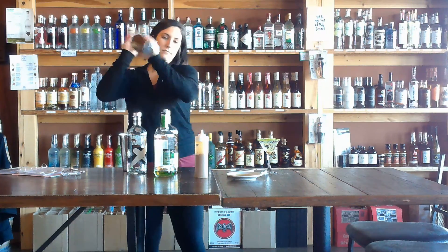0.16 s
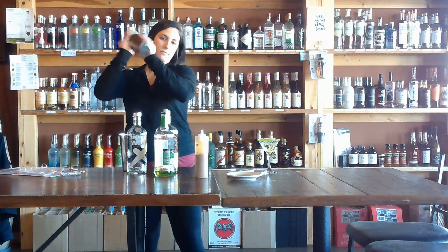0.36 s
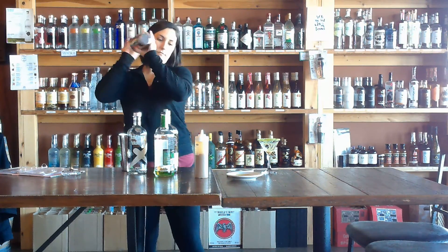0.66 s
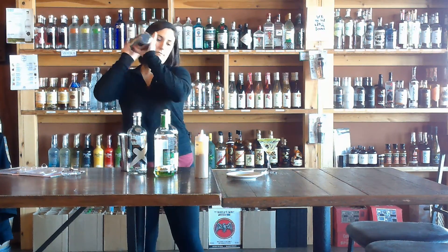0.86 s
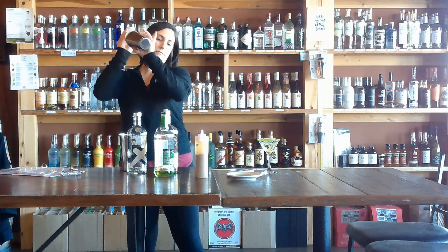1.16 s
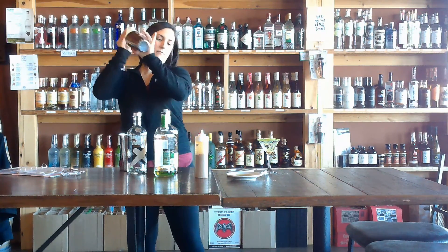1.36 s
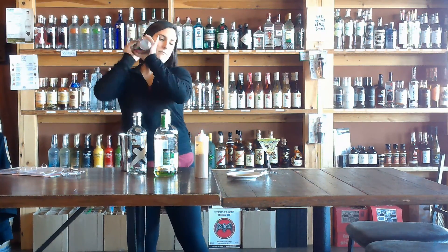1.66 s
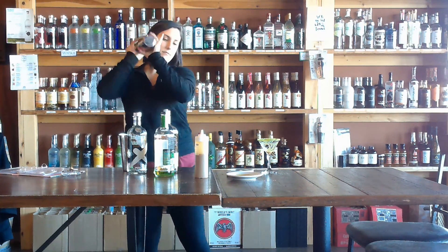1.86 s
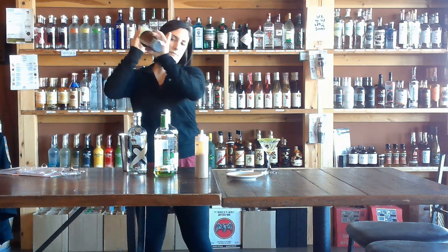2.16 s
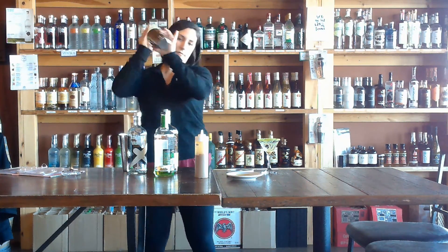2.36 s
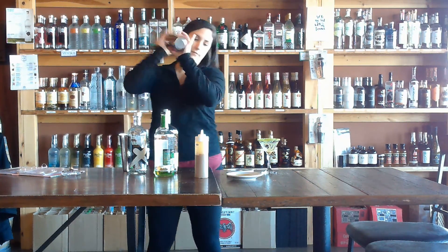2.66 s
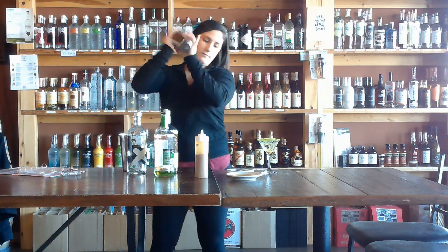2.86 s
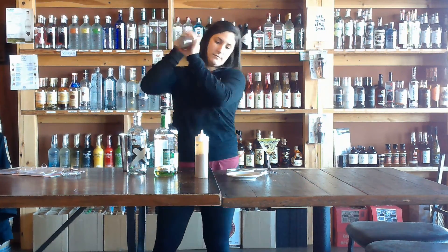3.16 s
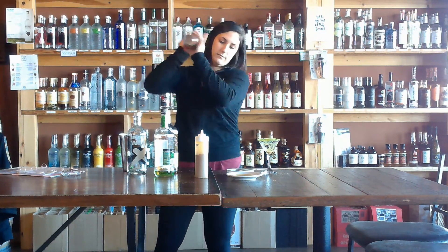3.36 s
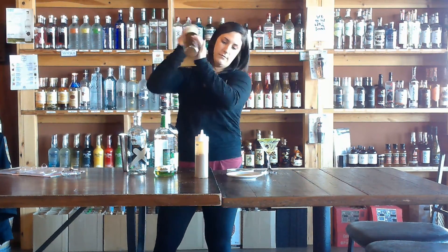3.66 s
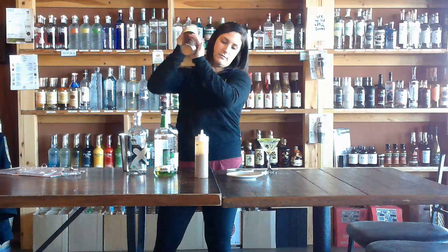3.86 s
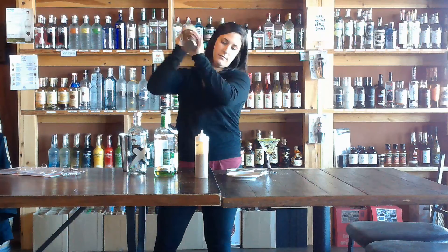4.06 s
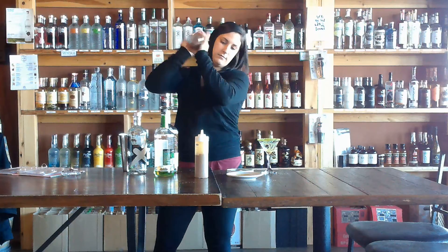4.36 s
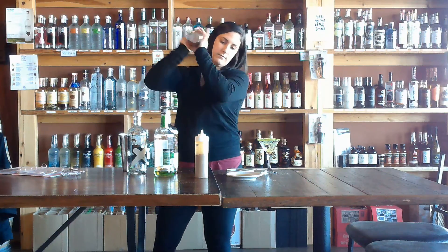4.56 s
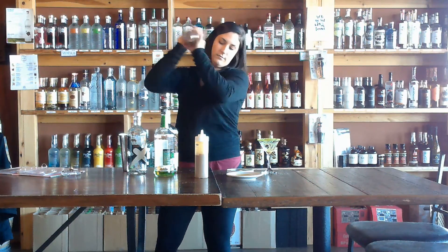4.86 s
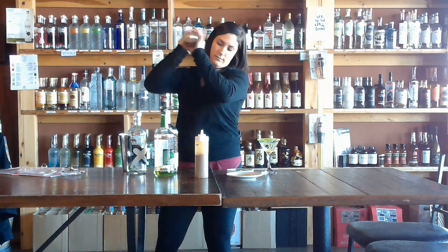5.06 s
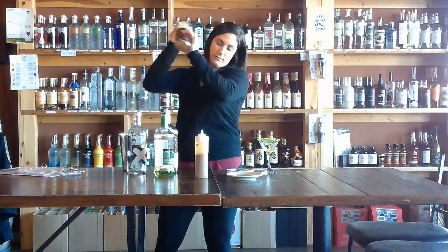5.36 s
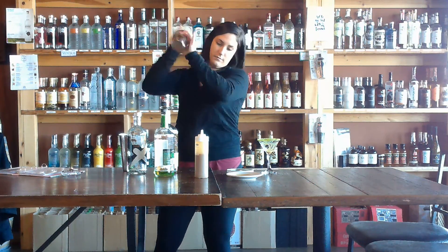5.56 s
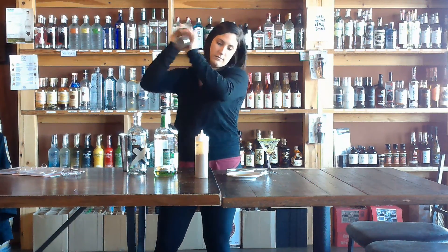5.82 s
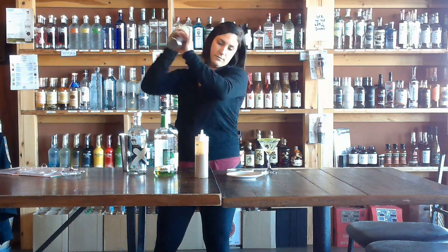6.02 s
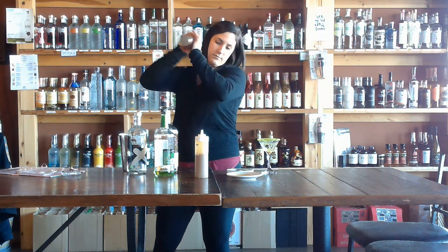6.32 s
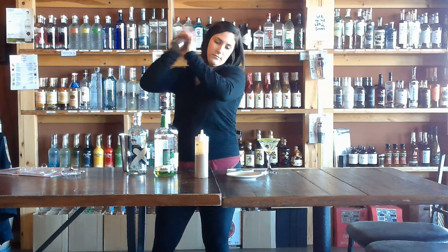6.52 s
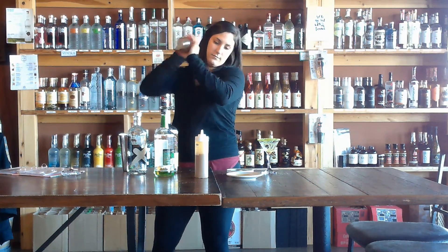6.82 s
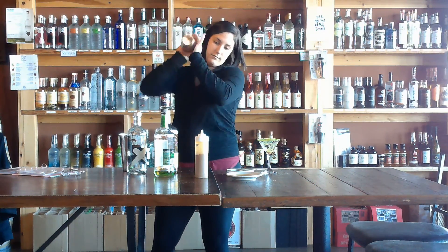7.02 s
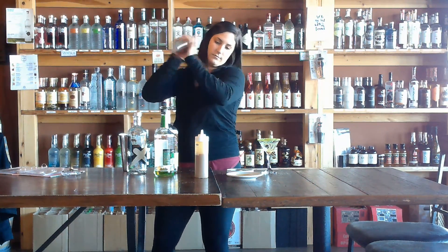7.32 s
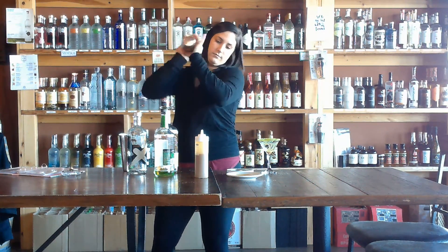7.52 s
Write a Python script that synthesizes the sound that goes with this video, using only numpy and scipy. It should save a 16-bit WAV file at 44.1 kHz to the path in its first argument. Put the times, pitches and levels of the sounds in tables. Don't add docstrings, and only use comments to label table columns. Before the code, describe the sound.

Ice and liquid surge to and fro inside a steel tin from start to end without a pause. Each cycle joins a dry, bright hiss of chips with a hard, short knock and some slosh; strengths vary, with irregular cracks. The stereo microphone stands a few metres off, catching early reflections from shelves and counter. Underneath, a lorry rumbles away early, then only low room hum and faint distant drone remain.

```python
import sys
import numpy as np
from scipy import signal
from scipy.fft import rfft, irfft
from scipy.io import wavfile
from scipy.ndimage import uniform_filter1d

SR = 44100
rng = np.random.default_rng(int(sys.argv[2]) if len(sys.argv) > 2 else 0)


def decibels_to_gain(level_db):
    exponent = np.asarray(level_db, float) / 20
    return 10 ** exponent


def generate_wav(signal):
    frames = np.transpose(np.atleast_2d(signal))
    scaled = np.clip(frames, -1, 1) * 32767
    pcm = np.round(scaled).astype(np.int16)
    wavfile.write(sys.argv[1], SR, pcm)


N = 338996

# start in [s], peak in [dB], ring in [Hz], ring length in [ms].
BASE_KNOCKS = [(0.1389, -34, 1700, 4.7), (0.3525, -22, 1610, 1.8), (0.557, -28, 1710, 2.5),
               (0.7639, -17.5, 1785, 2.9), (0.9649, -16, 1777, 4.2), (1.388, -14.5, 1754, 4.2),
               (1.5763, -16, 1770, 6.4), (1.6925, -34, 1766, 9.6), (1.7879, -20, 1690, 3.1),
               (1.9905, -18, 1785, 9.9), (2.1929, -20.5, 1700, 5.4), (2.397, -16.5, 1733, 9.6),
               (2.6288, -20, 1714, 4.3), (2.7019, -33, 1680, 6.8), (2.8376, -14.5, 1740, 1.3),
               (3.057, -20, 1680, 2), (3.2527, -23, 1740, 10), (3.675, -19.5, 1690, 1.7),
               (3.889, -13.5, 1740, 6.6), (4.1102, -19, 1693, 4.6), (4.3169, -22.5, 1680, 1.9),
               (4.9494, -21.5, 1790, 2.1), (5.3646, -19.5, 1774, 6), (5.4839, -30, 1800, 4.4),
               (6.0597, -20, 1750, 2.8), (6.7321, -23, 1690, 2.8), (6.9404, -32, 1740, 5.9),
               (7.0685, -35, 1860, 5.5), (7.17, -21, 1790, 2.5), (7.671, -20, 1740, 2.9)]


def unit(x):
    return x / np.sqrt(np.mean(x ** 2))


def colour(x, points):
    hz, db = np.transpose(points)
    log_hz = np.log(np.arange(N // 2 + 1) * SR / N + 1)
    return irfft(rfft(x) * decibels_to_gain(np.interp(log_hz, np.log(hz), db)), N)


def ring(x, hz, width_hz):
    return signal.lfilter(*signal.iirpeak(hz, hz / width_hz, SR), x)


def ring_twice(x, hz, width_hz):
    return ring(ring(x, hz, width_hz), hz, width_hz)


def grains(per_s, spread_db):
    hit = rng.random(N) < per_s / SR
    size = decibels_to_gain(spread_db * np.minimum(rng.exponential(size=N), 3))
    return unit(hit * rng.choice([-1, 1], N) * size)


def place(times_s, sounds):
    out = np.zeros(N + sounds.shape[1])
    for s, sound in zip(times_s, sounds):
        start = int(s * SR)
        out[start:start + len(sound)] += sound
    return out[:N]


def hard_contacts():
    # start in [s], peak in [dB], body in [dB re the edge].
    crack_rows = [(0.146, -29, -12), (0.169, -22, -25), (0.385, -22, -10), (0.615, -21, -13),
                  (0.965, -29, -11), (0.9792, -15.5, -16), (1.9886, -15, -17), (2.3092, -23, -16),
                  (2.396, -21, -27), (2.736, -24, -9), (2.8374, -18, -20), (3.055, -19, -23),
                  (3.382, -22.5, 0), (3.8886, -33, 6), (4.2081, -23, -14), (4.249, -19, -20),
                  (4.7375, -20, -8), (5.263, -24, -7), (5.2825, -22, -3), (5.3646, -19, -32),
                  (5.7044, -26, -5), (6.5126, -25, -20), (6.634, -24, -6), (6.731, -27, -9),
                  (6.963, -22, -16), (7.0494, -26, -14), (7.2864, -26, -21), (7.405, -20, -19),
                  (7.4345, -16.5, -20), (7.5457, -30, -35)]
    lead_s, touch_db, touch_body_db = 0.00077, -10.5, -8
    touches = [(s - lead_s, db + touch_db, touch_body_db) for s, db, *_ in BASE_KNOCKS]
    return np.transpose(crack_rows + touches)[:, :, None]


def chip_beams(per_s, spread_db, shared):
    own = np.array([grains(per_s, spread_db) for _ in "LR"])
    return own + shared * grains(per_s, spread_db)


def tin_wall(x, modes):
    return sum((-1) ** k * decibels_to_gain(db) * ring(x, hz, width_hz) for k, (hz, width_hz, db) in enumerate(modes))


def rattle():
    # time of peak in [s], chips in [dB], cubes in [dB].
    to_cap = [(0.725, -38, -40), (1.094, -37.5, -49), (1.297, -39.5, -62), (1.905, -44, -46),
              (2.13, -46, -52), (2.337, -44, -43), (2.533, -38.5, -49), (2.762, -36.5, -39),
              (2.97, -44, -46), (3.173, -38.5, -49), (3.404, -41.5, -64), (3.592, -42.5, -62),
              (3.801, -36.5, -38), (4.04, -36.5, -40), (4.25, -39.5, -48), (4.467, -35, -46),
              (4.659, -41, -38.5), (4.867, -35.5, -41), (5.062, -42, -52), (5.306, -36, -45),
              (5.518, -37.5, -34.5), (5.732, -36, -45), (5.993, -32.5, -43), (6.213, -37, -40),
              (6.413, -41, -40), (6.662, -38.5, -58), (6.864, -40, -38), (7.089, -36.5, -45),
              (7.319, -33.5, -37.5), (7.573, -35.5, -38)]
    # time of peak in [s], chips in [dB], cubes in [dB], drink in [dB].
    to_base = [(0.149, -49, -62, -45), (0.375, -53, -46, -39), (0.578, -37.5, -58, -31.5),
               (0.989, -54, -38, -53), (1.41, -52, -55, -53), (1.606, -44, -41, -38),
               (2.013, -39, -33, -47), (2.228, -41, -34, -61), (2.424, -37.5, -44, -54),
               (2.653, -41, -48, -39), (2.846, -34.5, -34.5, -42), (3.08, -43, -37, -44),
               (3.269, -41, -37.5, -37), (3.682, -43, -39, -37), (3.912, -48, -30.5, -51),
               (4.114, -51, -48, -58), (4.334, -40, -59, -37.5), (4.761, -41.5, -44, -35.5),
               (4.959, -38, -31.5, -37.5), (5.178, -49.5, -41, -37.5), (5.387, -39, -40, -37),
               (5.632, -44, -36, -33.5), (5.864, -42, -40, -35), (6.098, -42, -48, -37.5),
               (6.305, -54, -35, -49), (6.537, -49, -68, -39), (6.966, -49, -63, -41),
               (7.194, -41, -39, -37.5), (7.437, -48, -49, -43)]
    # time in [s], level in [dB].
    chatter = [(0.0, -21.5), (0.64, -28), (0.92, -21.5), (1.39, -25.5), (1.86, -26), (2.332, -28),
               (3.25, -28.5), (4.07, -27), (4.45, -26.5), (4.71, -29), (5.27, -30.5), (5.8, -26),
               (6.19, -27), (6.51, -27.5), (7.69, -28)]
    # frequency in [Hz], level in [dB].
    hiss = [(2000, -17), (5000, 1.5), (7000, 2.5), (10000, 0), (12000, 1), (14000, -0.5), (16000, 0.5),
            (18000, -37)]
    # frequency in [Hz], level in [dB].
    slosh = [(300, -10.5), (700, -19), (1000, -1.5), (1400, -0.5), (2200, 3), (4000, -20)]
    # frequency in [Hz], width in [Hz], level in [dB].
    wall_low = [(1750, 400, 5), (2475, 2370, -5.5), (1740, 50, 3), (2900, 900, -2.5), (3830, 1400, 1.5)]
    # frequency in [Hz], width in [Hz], level in [dB].
    wall_high = [(3048, 315, 4), (4620, 590, 1.5), (5284, 470, 8.5), (5450, 604, 7.5), (6480, 490, -8)]

    cap_ring_db, base_ring_db, ring_growth = -32, -42.5, 0.44
    cap_drink_db = -59
    cap = [(*row, cap_drink_db, cap_ring_db) for row in to_cap]
    base = [(*row, base_ring_db) for row in to_base]
    s, chips_db, cubes_db, drink_db, ring_db = np.transpose(cap + base)[:, :, None]
    ring_db = ring_db + ring_growth * (chips_db + 38)

    rise_s, fall_s, lead_s = 0.03, 0.031, 0.06
    t = np.arange(9000) / SR - lead_s
    swell = np.where(t < 0, np.exp(-(t / rise_s) ** 2), np.exp(-t / fall_s))
    start_s = s[:, 0] - lead_s
    rest = decibels_to_gain(np.interp(np.arange(N) / SR, *np.transpose(chatter)))

    contact_s, contact_db, _ = hard_contacts()
    spray_fade = np.exp(-np.arange(4000) / SR / 0.0099)
    spray = place(contact_s[:, 0], decibels_to_gain(contact_db - 20) * spray_fade)

    layers = [(chips_db - 0.4, -20, 1.0, colour(chip_beams(2200, 5.1, 0.71), hiss)),
              (cubes_db - 2.5, -14, 0.56, tin_wall(chip_beams(1000, 4.9, 0.85), wall_low)),
              (ring_db - 5, -21, 0.88, tin_wall(chip_beams(2000, 4.3, 0.11), wall_high)),
              (drink_db - 5, -22, 0.45, colour(grains(1500, 8.1), slosh))]
    out = 0
    for surge_db, rest_db, splinter_gain, sound in layers:
        level = place(start_s, decibels_to_gain(surge_db) * swell) + decibels_to_gain(rest_db) * rest + splinter_gain * spray
        out = out + level * unit(sound)
    return out


def knocks():
    s, db, hz, ms = np.transpose(BASE_KNOCKS)[:, :, None]
    t = np.arange(8000) / SR
    attack = np.minimum(t / 0.00066, 1)
    fade = np.exp(-(1000 * t / ms) ** 2) + decibels_to_gain(-36.5) * np.exp(-t / 0.033)
    base = np.sin(2 * np.pi * hz * t) * attack * fade
    thud_hz = 1080 * (1 + 0.1 * rng.standard_normal((len(s), 1)))
    thud = np.sin(2 * np.pi * thud_hz * t) * np.exp(-t / 0.0047)
    thud_db = -26.5 + 2.5 + 0.38 * db
    return place(s[:, 0] - 0.0003, decibels_to_gain(db + 6) * base + decibels_to_gain(thud_db) * thud)


def cracks():
    s, db, body_db = hard_contacts()
    click_s = s[:, 0] + 0.00024
    edge = ring_twice(place(click_s, decibels_to_gain(db + 16.5)), 15400, 8700)
    body = ring_twice(place(click_s, decibels_to_gain(db + body_db + 26)), 7700, 4000)
    low = ring_twice(place(click_s, decibels_to_gain(db)), 4400, 3500)
    return edge + body + low


def response():
    # delay in [ms], left in [dB], right in [dB].
    early_echoes = [(8.01, -8, -14), (12.7, -20.5, -8.5), (16.55, -11.5, -5), (20.34, -6, -10),
                    (23.26, -3.5, -1.5), (28.47, -3.5, -31), (32.8, -7.5, -12), (38, -6, -9),
                    (49.94, -27.5, -16), (62.04, -13, -11.5), (69.65, -13.5, -8.5), (87.4, -17, -7.5)]
    # frequency in [Hz], T60 in [s].
    tail_t60 = [(500, 1), (1700, 0.9), (4000, 0.47), (8000, 1), (16000, 0.35)]
    # left, right in [dB].
    tail_db = (-32, -32.5)
    # left, right in [dB].
    direct_db = (-2.5, 0)
    left_lag = 2

    t = np.arange(SR) / SR
    hz, t60_s = np.transpose(tail_t60)
    onset = np.clip((t - 0.012) / 0.0095, 0, 1)
    echo = 0
    for band_hz in 500 * 2. ** np.arange(0, 5.1, 0.5):
        fade = decibels_to_gain(-60 * t / np.interp(np.log(band_hz), np.log(hz), t60_s)) * onset
        mid, side = ring(rng.standard_normal((2, SR)), band_hz, band_hz / 3)
        side = side * min(band_hz / 1800, 1)
        echo = echo + fade * np.array([mid + side, mid - side]) * decibels_to_gain(tail_db)[:, None]
    for ms, *db in early_echoes:
        at = int(ms * SR / 1000) + rng.integers(25) + rng.integers(3, size=2)
        echo[[0, 1], at] += decibels_to_gain(np.array(db) + 0.5)
    echo = signal.lfilter([0.3], [1, -0.7], echo)
    scatter = np.diff(rng.standard_normal((2, 301))) * np.exp(-t[:300] / 0.0016)
    echo[:, :300] += decibels_to_gain(-18) * scatter
    echo[0, left_lag] += decibels_to_gain(direct_db[0])
    echo[1, 0] += decibels_to_gain(direct_db[1])
    return echo


def room(x, count=7):
    hold = 3000
    spot = np.repeat(rng.integers(count, size=N // hold + 1), hold)[:N]
    out = 0
    for k in range(count):
        share = np.sqrt(np.abs(uniform_filter1d(1. * (spot == k), size=1500)))
        out = out + signal.fftconvolve(x * share, response(), axes=1)[:, :N]
    return out


def background():
    # time in [s], engine drone in [dB], throb of the lower gear in [dB].
    lorry = [
        (0.0, -37, -32),
        (0.3, -35, -54),
        (0.9, -36.5, -47),
        (1.3, -35.5, -42.5),
        (1.7, -40, -42),
        (2.2, -53, -43.5),
        (2.8, -65, -45),
        (3.102, -52.5, -51),
        (7.69, -50.5, -57),
    ]
    # frequency in [Hz], width in [Hz], level in [dB].
    drone_bands = [(118.4, 7.5, -2.5), (141.7, 18.6, -5.5), (182, 21, -9), (273, 82, -15),
                   (480, 140, -18.5)]
    # frequency in [Hz], density in [dB per Hz].
    hum_spectrum = [(65, -25), (120, 2), (156, -3), (300, -14.5), (469, -6), (691, -8), (900, 0.5),
                    (1170, -33.5)]
    deep_spectrum = [(8, -9), (22, 1.5), (40, -9), (52, -1), (62, -5), (90, -29.5)]  # (Hz, dB)

    t = np.arange(N) / SR
    s, drone_db, throb_db = np.transpose(lorry)
    noise = rng.standard_normal((4, 2, N))
    drone = sum(decibels_to_gain(db) * unit(ring_twice(noise[0], hz, width_hz)) for hz, width_hz, db in drone_bands)
    deep = colour(noise[1], deep_spectrum)
    throb = ring_twice(noise[3], 94.6, 38)
    deep_db = -40 + 5 * np.exp(-t / 1.17)
    low = decibels_to_gain(np.interp(t, s, drone_db)) * unit(drone)
    low = low + decibels_to_gain(np.interp(t, s, throb_db)) * unit(throb)
    low = low + decibels_to_gain(deep_db) * unit(deep)
    hum = decibels_to_gain(-53.5) * unit(colour(noise[2], hum_spectrum))
    mid = low[0] + hum[0]
    side = decibels_to_gain(-18) * low[1] + decibels_to_gain(-3) * hum[1]
    return np.array([mid + side, mid - side])


def scene():
    base_gain = decibels_to_gain(np.array([[-3.5], [0]]))
    shaker = knocks() * base_gain + cracks() + rattle()
    return room(shaker) + background()


def top_cut(x):
    return signal.sosfilt(signal.butter(12, 16960, fs=SR, output="sos"), x)


def record(dry):
    square = dry ** 2
    bent = dry + 0.7 * (square - uniform_filter1d(square, size=64))
    top_hz = 15730
    low_pass = signal.ellip(14, 0.15, 45, top_hz, fs=SR, output="sos")
    cut = signal.sosfiltfilt(low_pass, bent)
    return top_cut(cut)


dry = scene()
out = record(dry)
generate_wav(out)
```